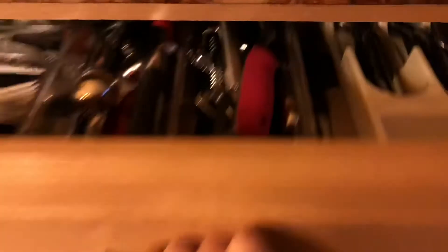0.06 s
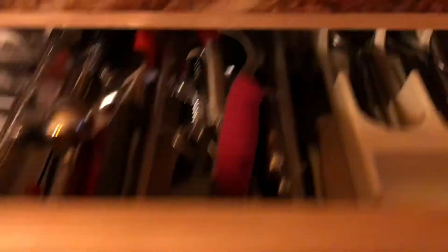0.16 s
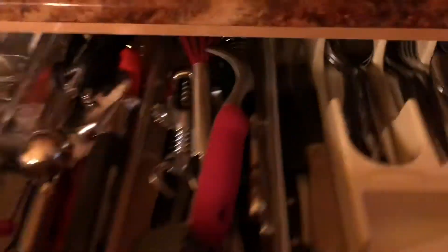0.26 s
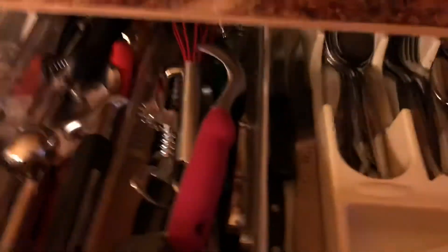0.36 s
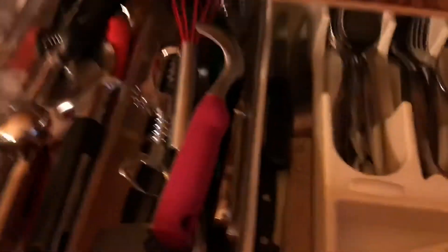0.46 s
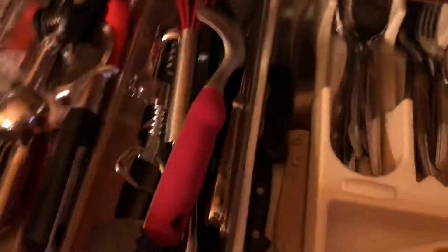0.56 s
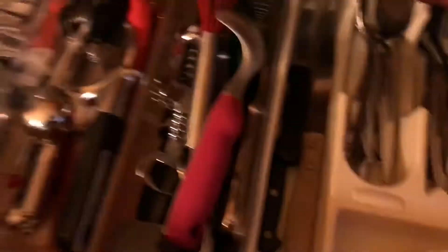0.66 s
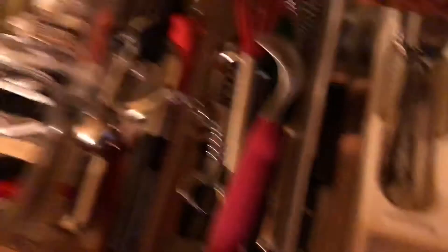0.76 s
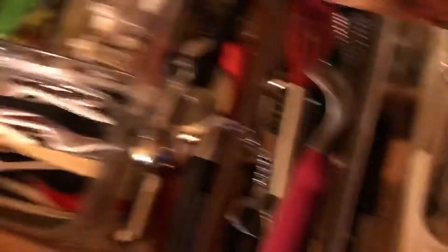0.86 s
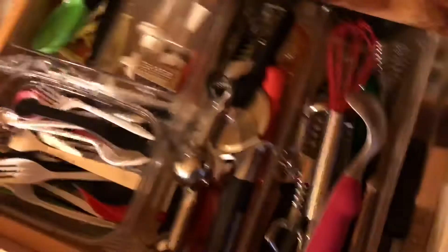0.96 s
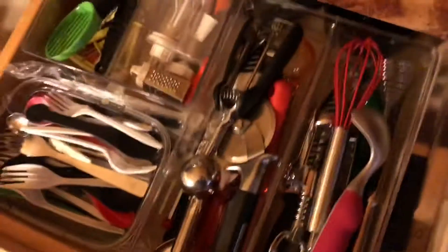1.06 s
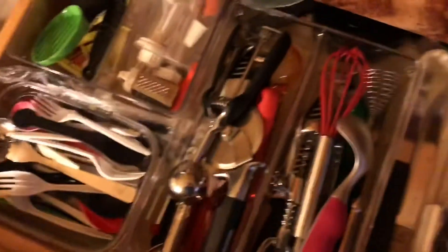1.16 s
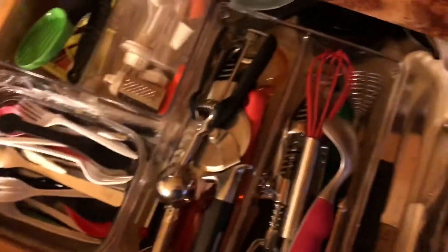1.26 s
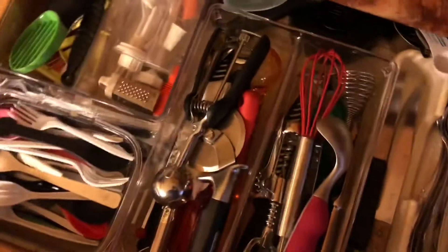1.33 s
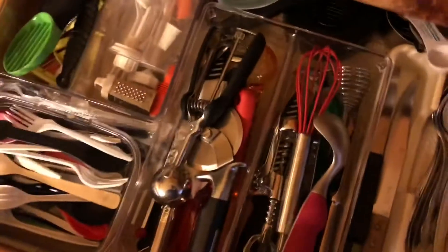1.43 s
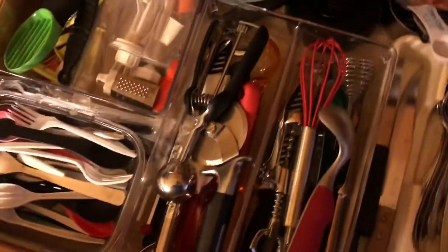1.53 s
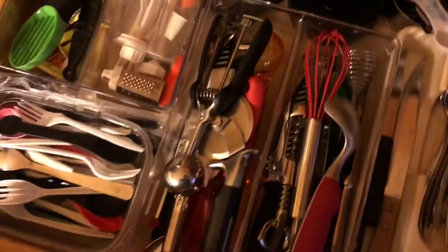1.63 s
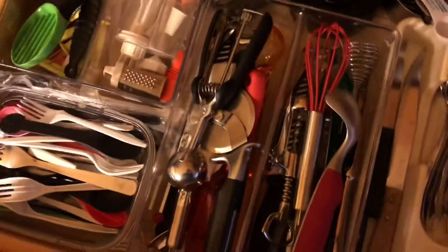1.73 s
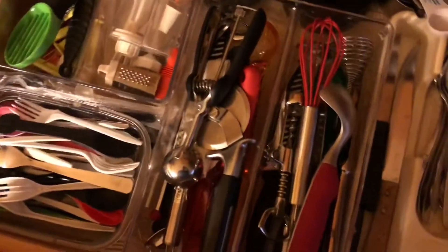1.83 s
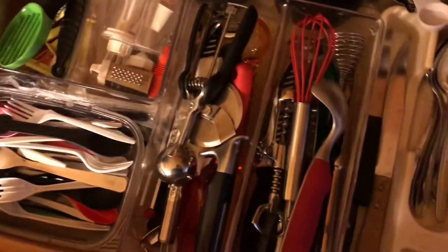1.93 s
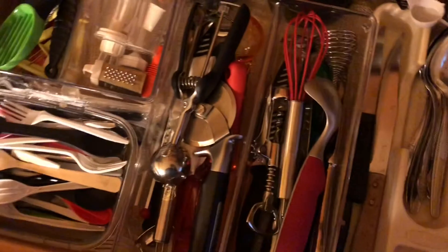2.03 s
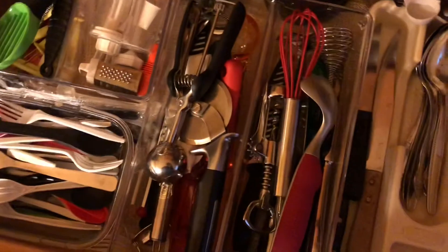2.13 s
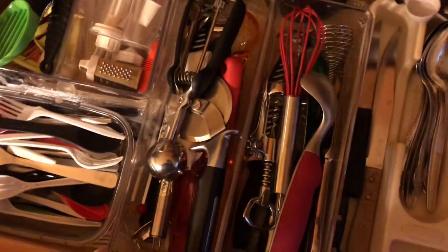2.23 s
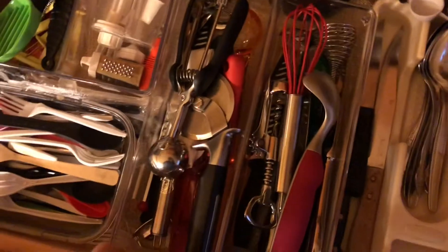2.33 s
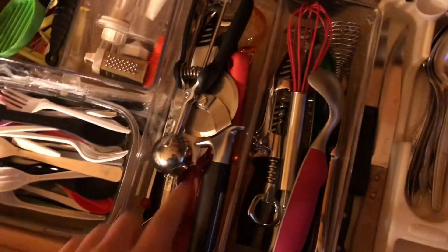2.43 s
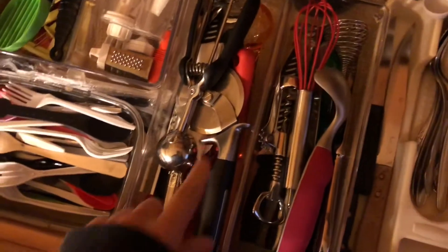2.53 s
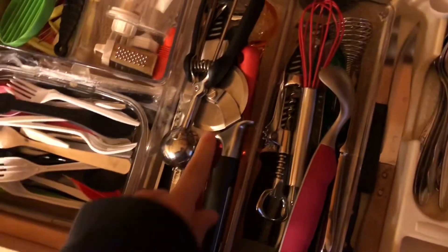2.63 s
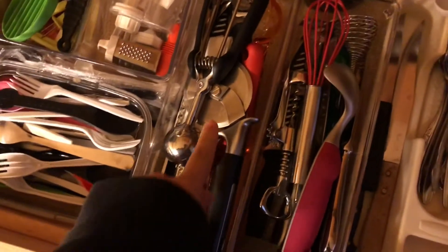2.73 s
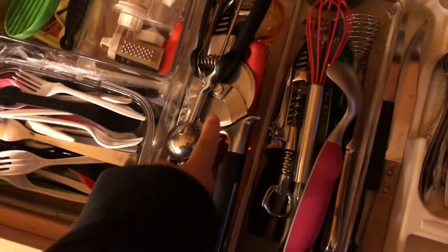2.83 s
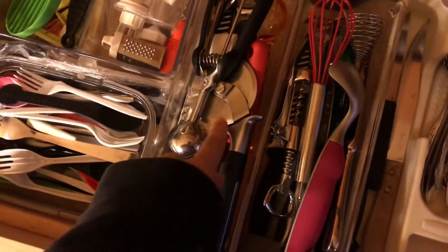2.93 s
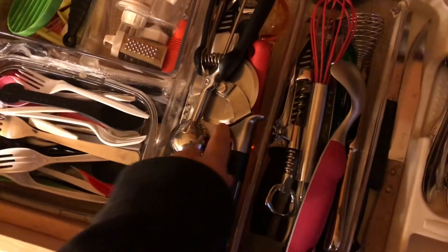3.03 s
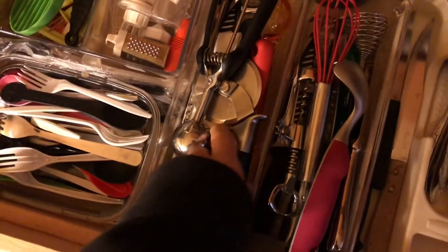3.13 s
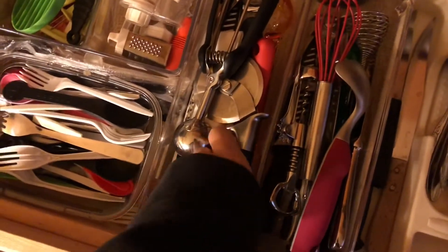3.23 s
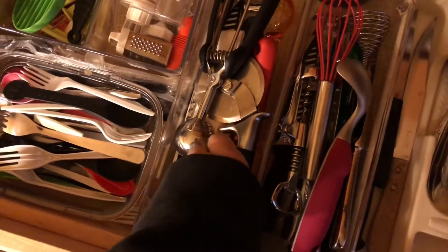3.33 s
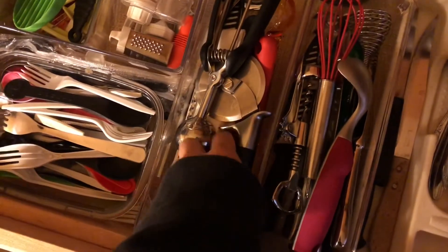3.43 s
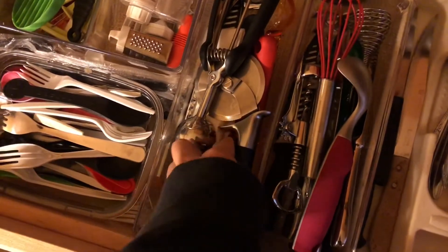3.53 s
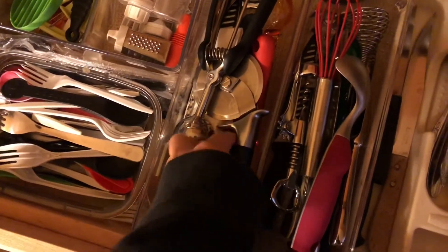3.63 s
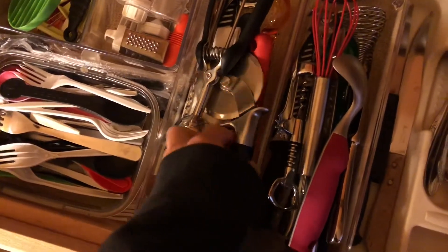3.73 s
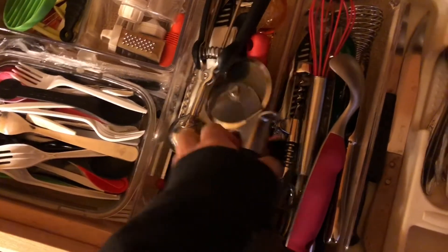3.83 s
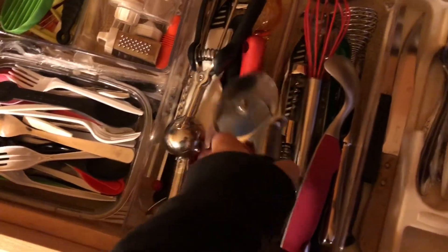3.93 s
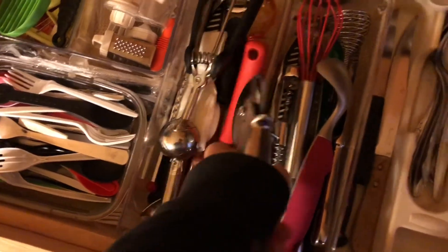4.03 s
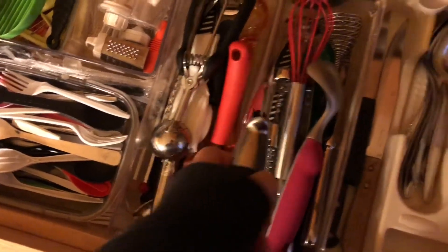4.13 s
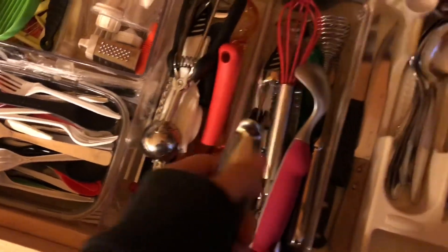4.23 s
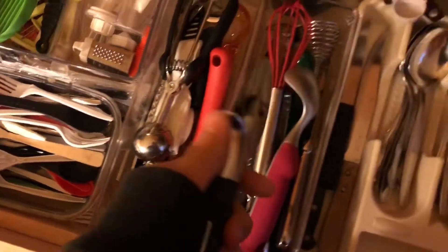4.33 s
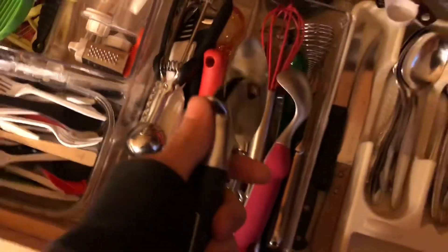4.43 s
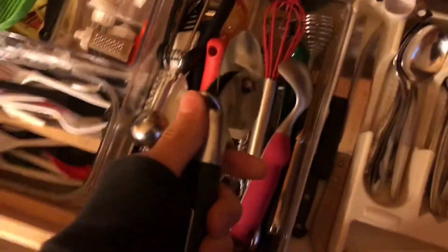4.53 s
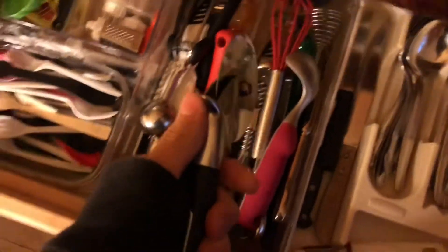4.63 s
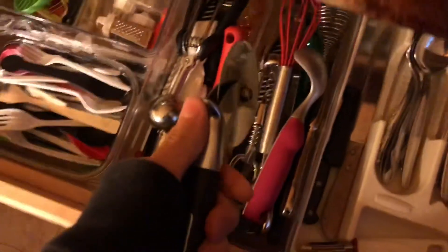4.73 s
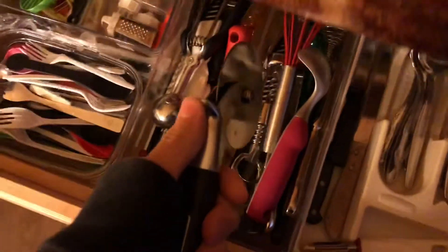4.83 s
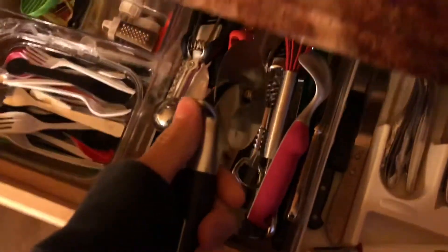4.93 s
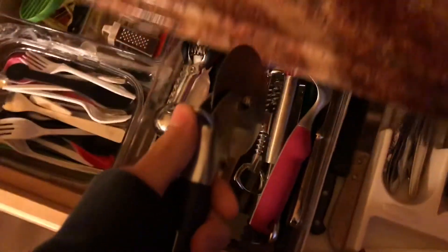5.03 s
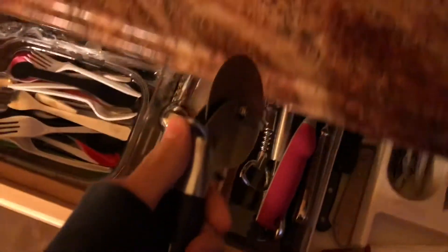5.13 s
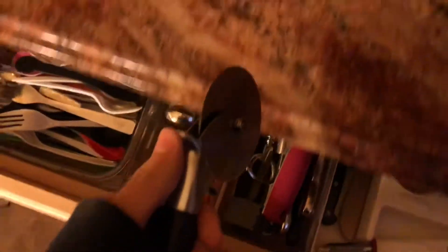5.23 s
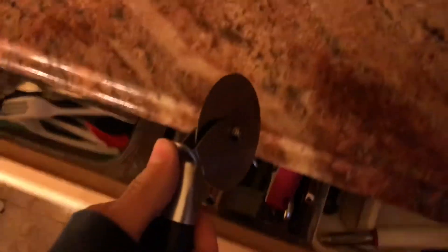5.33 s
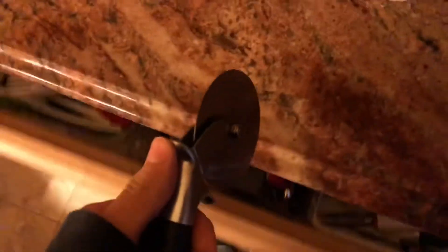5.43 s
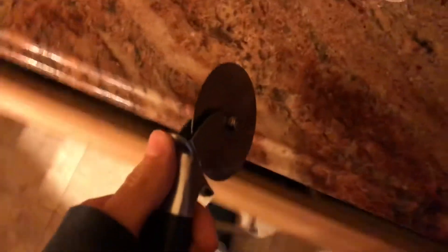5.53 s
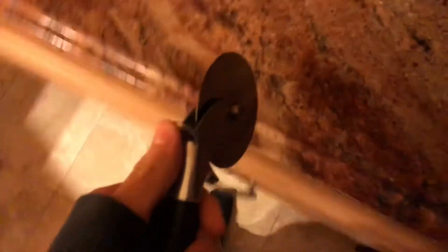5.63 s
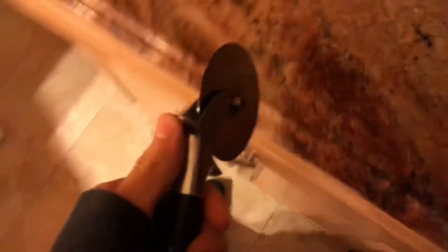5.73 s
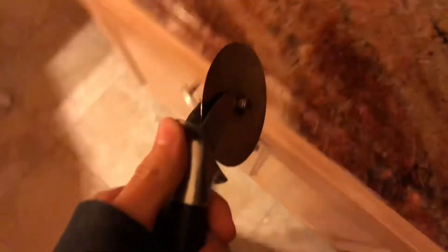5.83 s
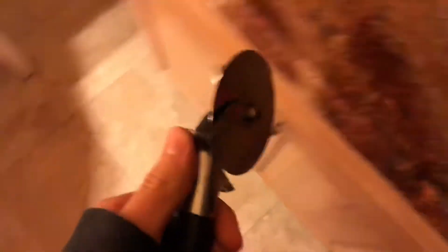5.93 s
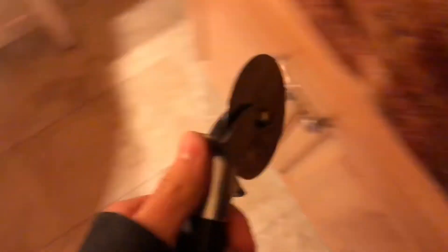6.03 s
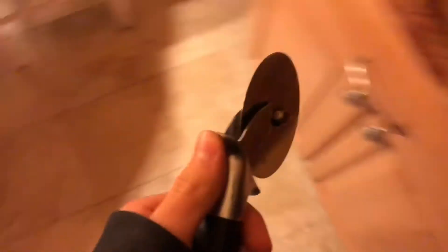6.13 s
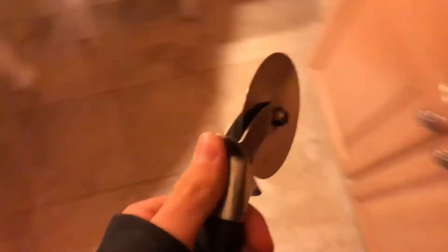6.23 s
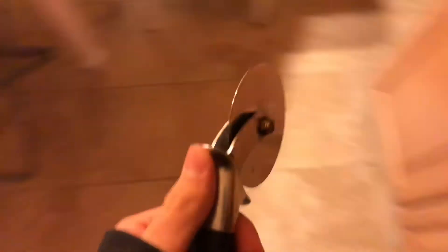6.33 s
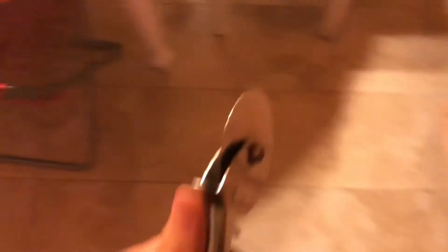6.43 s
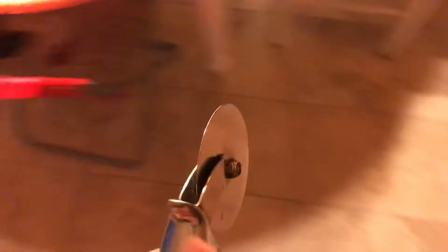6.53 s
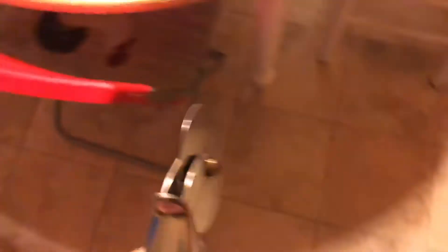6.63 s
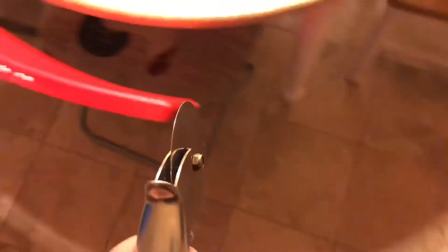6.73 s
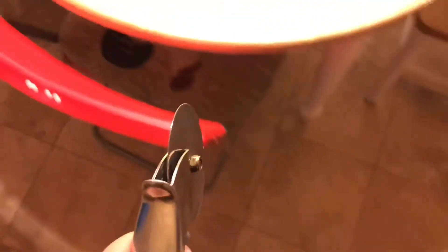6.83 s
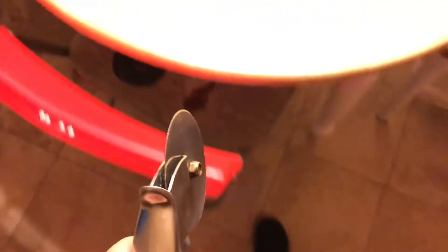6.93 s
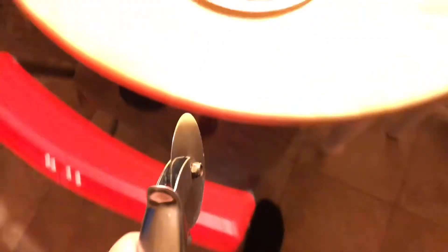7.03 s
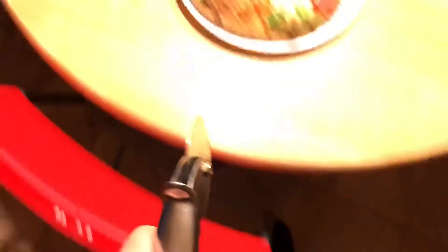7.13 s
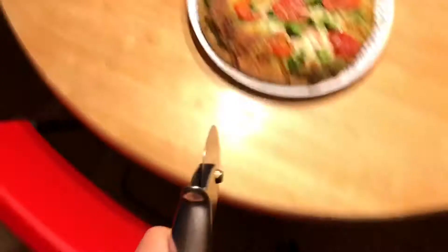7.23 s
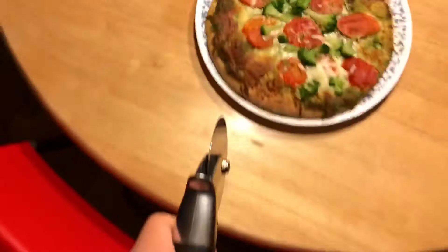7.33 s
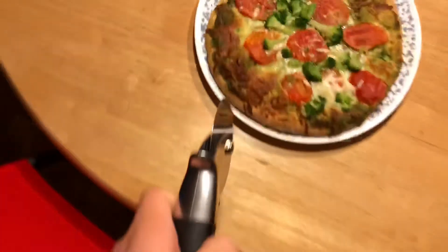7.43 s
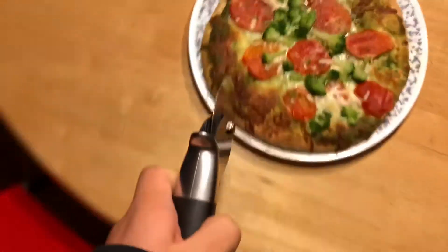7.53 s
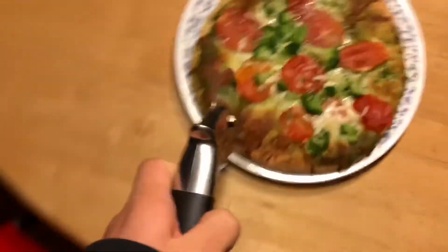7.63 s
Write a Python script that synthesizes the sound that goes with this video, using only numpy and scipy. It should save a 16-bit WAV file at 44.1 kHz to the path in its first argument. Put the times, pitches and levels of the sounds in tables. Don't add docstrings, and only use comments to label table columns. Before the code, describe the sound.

Heard close through a phone in a small, hard kitchen. From 0 s a wooden drawer is already rolling out: rough low drumming from the rollers, scraping slides and loose tools chattering, with knocks and clinks near 0.5-0.65 s and more rattles around 1.1 and 1.5 s. It settles by 1.8 s, leaving quiet room tone, handling rumble and faint sleeve rustle. At 3.2 and 3.5 s fingers nudge utensils with light clinks and dull taps. From 3.8 s digging turns hard, peaking at 4.0-4.25 s in a loud, dense metal clatter with woody knocks as the pizza cutter comes free. Its disc rings high and thin, beating and slowly fading to the end. The drawer rumbles shut from 4.5 s, quickens around 5.2 s and thuds at 5.75 s. Shoes scuff at 6.4-6.5 s and a heel lands at 7.5 s, over a faint low fridge drone.

```python
import sys
import numpy as np
from scipy import signal
from scipy.fft import rfft, irfft
from scipy.io import wavfile
from scipy.ndimage import uniform_filter1d

SR = 44100
rng = np.random.default_rng(int(sys.argv[2]) if len(sys.argv) > 2 else 0)


def unload_audio(sound):
    columns = np.transpose(np.atleast_2d(sound))
    steps = np.round(np.clip(columns, -1, 1) * 32767)
    wavfile.write(sys.argv[1], SR, steps.astype(np.int16))


def gain_from_decibels(decibels):
    exponent = np.asarray(decibels, float) / 20
    return 10 ** exponent


N = 337806

# t/s, load level/dB, speed level/dB
OPENING = [
    (0, -48, -2),
    (.34, -51, -7.5),
    (.46, -53, -12.5),
    (.61, -58, -13),
    (.84, -54.5, -9.5),
    (1.02, -50.5, -14),
    (1.14, -52, -14.5),
    (1.41, -63.5, -15),
    (1.77, -83, -13.5),
]
# t/s, load level/dB, speed level/dB
CLOSING = [
    (4.4, -85, -14),
    (4.55, -43.5, -9.5),
    (4.69, -51, -8.5),
    (5, -50.5, -10),
    (5.22, -51, 2),
    (5.5, -52.5, -8),
    (5.71, -53.5, -10),
    (5.78, -36.5, -9),
    (6, -70, -23),
]


def level(x, db):
    return x * gain_from_decibels(db) / np.sqrt(np.mean(x ** 2))


def band(x, hz, width_hz):
    return signal.lfilter(*signal.iirpeak(hz, hz / width_hz, SR), x)


def body(x, modes):
    total = 0
    for k, (hz, width_hz, db) in enumerate(modes):
        resonance = band(band(x, hz, width_hz), hz, 3 * width_hz)
        total = total + (-1) ** k * gain_from_decibels(db) * resonance
    return level(total, 0)


def walk(rate):
    hold = int(SR / rate)
    steps = np.repeat(rng.standard_normal(N // hold + 1), hold)
    return 1.72 * uniform_filter1d(uniform_filter1d(steps, hold), hold)[:N]


def fade(t, t60):
    return np.exp(-np.log(1000) * t / np.maximum(t60, 0.004))


def add(out, s, sound):
    i = int(s * SR)
    out[i:i + len(sound)] += sound[:N - i]


def cluster(t, lo_hz, hi_hz, t60, chance, push_s):
    place, size, life, late = chance[:, :, None]
    since = np.maximum(t - push_s * late, 0)
    hz = lo_hz * (hi_hz / lo_hz) ** place
    rings = np.sin(2 * np.pi * hz * since) * fade(since, t60 * (0.21 + life))
    sound = np.sum(size * rings, axis=0)
    return sound / np.abs(sound).max()


def burst(t, lo_hz, hi_hz, t60):
    sos = signal.butter(2, [lo_hz, hi_hz], "bandpass", fs=SR, output="sos")
    noise = level(signal.sosfilt(sos, rng.standard_normal(len(t))), 0)
    return noise * fade(t, t60) * np.minimum(t / 0.001, 1)


def grit(scatter_db, flicker_db, rate):
    slip_db = scatter_db * np.minimum(rng.exponential(size=N), 4.5)
    return rng.standard_normal(N) * gain_from_decibels(slip_db + flicker_db * walk(rate))


def air():
    # f/Hz, level/dB per Hz
    room_tone = [(59, -32.5), (100, -8), (244, -3.5), (328, -15.5), (373, -8), (492, -13.5), (2080, -23.5),
                 (16000, -32)]
    hz, db = np.transpose(room_tone)
    f = np.fft.rfftfreq(N, 1 / SR) + 1
    colour = gain_from_decibels(np.interp(np.log(f), np.log(hz), db))
    return level(irfft(colour * rfft(rng.standard_normal(N)), N), -71)


def rumble():
    # t/s, peak level/dB
    thump_hits = [(.08, -77), (.3, -57), (.58, -53.5), (1.05, -64), (1.3, -59), (1.54, -62), (4.12, -65),
                  (5.05, -67.5), (5.37, -65), (5.78, -60), (6.05, -64), (6.5, -58), (7.6, -57)]
    rest_db, rise_s, t60_s = -70.5, 0.046, 0.51
    t = np.arange(N) / SR
    shake = level(band(band(rng.standard_normal(N), 71, 60), 55, 47), 0)
    strength = gain_from_decibels(rest_db)
    for s, db in thump_hits:
        swell = np.exp(np.minimum(t - s, 0) / rise_s)
        strength = strength + gain_from_decibels(db) * swell * fade(np.maximum(t - s, 0), t60_s)
    return shake * strength


def motion():
    # t/s, load level/dB, speed level/dB
    digging = [
        (3.05, -83, -4),
        (3.23, -59, -25),
        (3.57, -98, 5),
        (3.69, -69.5, -5),
        (3.86, -48.5, -1),
        (3.98, -60.5, -6.5),
        (4.16, -40.5, -2.5),
        (4.28, -57.5, -23),
        (4.36, -65, -20),
    ]
    # t/s, load level/dB, speed level/dB
    walking = [
        (6.019, -66, -24),
        (6.41, -77.5, 0.5),
        (6.43, -66.5, 3),
        (6.6, -62, -12.5),
        (6.83, -68.5, -12.5),
        (7.37, -77.5, -8.5),
        (7.5, -77, -1),
        (7.547, -46.5, -5),
        (7.66, -51.5, -11),
    ]
    # scrape level/dB and hiss level/dB below its load, share of speed/1
    rubbing = [
        (-13.5, -16, 0.43),
        (-13, -13, 1),
        (-18, -30.5, 0.51),
        (0, -16, 0.93),
    ]
    # level/dB of box, panel, scrape, hiss, runners
    rest_db = (-73.5, -84, -98.5, -82.5, -89)
    # middle t/s, length/s, level/dB
    brushes = [
        (0.288, 0.42, -70.5),
        (1.306, 0.3, -72),
        (2.795, 1, -86),
        (3.831, 0.11, -59),
        (3.943, .07, -54),
        (5.67, 0.4, -74.5),
        (7.119, 1, -75.5),
    ]
    # f/Hz, width/Hz, level/dB
    box_modes = [(146, 38, -2), (210.4, 36.6, -1), (294, 83, -2.5), (380, 78, -6)]
    # f/Hz, width/Hz, level/dB
    panel_modes = [(526, 112, 6.3), (700, 45, 3.6), (878, 181, 2)]
    # f/Hz, width/Hz, level/dB
    runner_modes = [(1072, 330, 3.5), (1300, 300, 0), (1620, 350, -9.5)]
    # f/Hz, width/Hz, level/dB
    scrape_modes = [(1950, 3300, -5.5), (3300, 2800, 0), (4360, 3100, -7)]
    # f/Hz, width/Hz, level/dB
    hiss_modes = [(7100, 4500, 0.92), (11400, 1800, 0.5), (14160, 3600, 1.5)]
    # f/Hz, width/Hz, level/dB
    slide_modes = [(1650, 690, 1.5), (3200, 1200, -4.5), (4200, 1050, -2), (5600, 1200, -2.5)]
    slide_until_s, brush_scrape_db = 2.8, -7
    t, gains = np.arange(N) / SR, gain_from_decibels(np.array(rest_db))[:, None]
    for move, (scrape_db, hiss_db, share) in zip((OPENING, digging, CLOSING, walking), rubbing):
        s, load_db, speed_db = np.transpose(move)
        load = np.interp(t, s, load_db, left=-120, right=-120)
        speed = np.interp(t, s, speed_db)
        scrape_part = scrape_db + share * speed
        hiss_part = hiss_db + share * speed
        runner_part = -5 + 1.46 * speed
        gains = gains + gain_from_decibels(load + np.array([0 * t, speed, scrape_part, hiss_part, runner_part]))
    brush = 0
    for s, length, db in brushes:
        brush = brush + gain_from_decibels(db) * np.cos(np.pi * np.clip((t - s) / length, -0.5, 0.5)) ** 2
    roll = grit(0.94, 0.65, rate=80)
    rub = grit(2.3, 0.82, rate=53)
    low = gain_from_decibels(-1.7) * gains[0] * body(roll, box_modes)
    low = low + gain_from_decibels(1.5) * gains[1] * body(roll, panel_modes)
    low = low + gains[4] * body(grit(2.3, 1.2, rate=83), runner_modes)
    colour = np.where(t < slide_until_s, gain_from_decibels(1.0) * body(rub, slide_modes), body(rub, scrape_modes))
    scrape = (gains[2] + gain_from_decibels(brush_scrape_db) * brush) * colour
    hiss = (gains[3] + brush) * body(rub, hiss_modes)
    return low + gain_from_decibels(1.5) * scrape + gain_from_decibels(-0.5) * hiss


def rollers():
    pitch_hz, wander = 296, 0.11
    t, load = np.arange(N) / SR, 0
    for move, db in zip((OPENING, CLOSING), (1.5, -0.5)):
        s, load_db, speed_db = np.transpose(move)
        load = load + gain_from_decibels(np.interp(t, s, load_db + db + 0.45 * speed_db, left=-120, right=-120))
    hz = pitch_hz * (1 + wander * walk(90))
    note = np.sin(2 * np.pi * np.cumsum(hz) / SR)
    return load * note * gain_from_decibels(2.0 * walk(70))


def knocks():
    # t/s, peak level/dB, f/Hz
    chatter = [(0.038, -42, 1210), (0.114, -50, 918), (0.137, -52, 947), (0.177, -56, 1150),
               (0.208, -53, 930), (0.478, -50, 907), (1.017, -57, 991), (1.038, -51, 880),
               (1.081, -45, 920), (1.099, -41, 830), (1.201, -52, 864), (1.226, -48, 896),
               (1.277, -51, 870)]
    # t/s, peak level/dB, f/Hz, t60/s
    bumps = [(0.501, -42.5, 790, 0.063), (0.518, -31, 292, 0.082), (0.547, -27, 700, 0.019),
             (0.56, -39, 483, 0.078), (0.985, -40, 395, 0.052), (1.147, -47, 380, 0.04),
             (1.478, -47.5, 175, 0.38), (1.494, -47, 890, 0.037), (3.048, -55, 840, 0.041),
             (3.183, -41, 927, 0.07), (3.197, -29, 395, 0.02), (3.196, -33, 1070, 0.027),
             (3.511, -41, 350, 0.043), (3.766, -44, 376, 0.38), (3.801, -35.5, 740, 0.045),
             (3.83, -31.5, 776, 0.094), (3.855, -27, 805, 0.035), (3.979, -32, 920, 0.036),
             (4.038, -23.5, 348, 0.19), (4.064, -25.5, 944, 0.031), (4.1055, -12, 824, 0.048),
             (4.117, -23, 944, 0.067), (4.173, -24, 605, 0.046), (4.202, -14.5, 1085, 0.045),
             (4.228, -33, 963, 0.086)]
    # t/s, peak level/dB, f/Hz, t60/s
    landings = [(4.525, -29.5, 345, 0.034), (4.558, -40, 322, 0.32), (5.365, -44, 524, 0.28),
                (5.728, -39, 700, 0.066), (5.748, -32.5, 212, 0.1), (5.765, -31, 266, 0.029),
                (5.79, -29.5, 140.3, 0.24), (5.823, -49, 133, 0.2), (5.823, -37.5, 4120, 0.053),
                (5.862, -41.5, 3900, 0.053), (6.532, -40.5, 466, 0.039), (6.54, -50, 90.5, 0.16),
                (7.505, -37.5, 145, 0.15), (7.545, -37, 143, 0.34), (7.579, -34, 125, 0.058)]
    # t/s, peak level/dB, f/Hz, t60/s
    tray = [(3.177, -42.5, 642, 0.051), (3.319, -48, 730, 0.044), (3.712, -52, 700, 0.04),
            (3.732, -54, 1020, 0.061), (3.785, -47, 1100, 0.052), (3.812, -34, 916, 0.05),
            (3.842, -40, 990, 0.042), (3.864, -26.5, 885, 0.022), (4.0075, -28, 1364, 0.019),
            (4.107, -28, 144, 0.18), (4.108, -37, 1210, 0.089), (4.112, -24.5, 399, 0.081),
            (4.205, -31, 377.3, 0.2), (4.206, -17.5, 836, 0.055), (6.424, -49, 1207, 0.11),
            (6.436, -47.5, 1300, 0.15), (6.468, -48, 1160, 0.092), (7.52, -39.5, 210, 0.04)]
    chatter_db, chatter_t60_s = -4.5, 0.049
    rattle_t60_s = 0.083
    chattering = [(s, db + chatter_db, hz, chatter_t60_s) for s, db, hz in chatter]
    blows = bumps + landings + chattering + tray
    out, t = np.zeros(N), np.arange(7000) / SR
    chance = rng.random((len(blows), 4, 8))
    for (s, db, hz, t60), luck in zip(blows, chance):
        board = np.sin(2 * np.pi * hz * t) * fade(t, t60) * np.minimum(t / 0.0029, 1)
        brief = min(t60, rattle_t60_s)
        others = cluster(t, 0.55 * hz, 2.0 * hz, 0.807 * brief, luck, push_s=0.00632)
        rattle = burst(t, 0.45 * hz, 2.1 * hz, 1.1 * brief)
        add(out, s, gain_from_decibels(db) * (0.78 * board + 0.33 * others + 0.38 * rattle))
    return out


def clinks():
    # t/s, body peak level/dB, bright peak level/dB, body f/Hz, bright f/Hz
    jolts = [(0.1746, -66, -49, 1130, 4700), (0.3527, -37.5, -48, 1190, 4800),
             (0.502, -48, -53, 1320, 8230), (0.517, -39, -66, 1170, 6510), (0.544, -39, -53, 1240, 5750),
             (0.64, -31, -42, 1300, 5160), (0.6488, -27, -36.5, 1507, 7600),
             (0.7675, -38.5, -50, 1550, 5530), (1.08, -47, -57, 1620, 15360), (1.101, -45, -57, 1690, 4650),
             (1.144, -49, -52, 1500, 7900), (1.228, -59, -55, 1300, 4600), (1.455, -53, -70, 1490, 5400),
             (1.477, -46.5, -70, 1570, 5420), (1.4955, -43.5, -57, 2100, 4820),
             (1.5202, -43, -56, 1410, 6080), (1.5466, -44, -55, 1500, 4720),
             (1.5658, -45.5, -60, 1570, 4750), (1.588, -53, -68, 1500, 5400),
             (1.7487, -53.5, -66, 2200, 5940)]
    probes = [(3.1743, -52, -47, 1340, 12380), (3.181, -54, -47, 1390, 4860),
              (3.1961, -32.5, -41, 1180, 12360), (3.2467, -33.5, -44.5, 1446, 6140),
              (3.4882, -38, -42, 1740, 6100), (3.501, -45.5, -43, 3520, 6210),
              (3.512, -39.5, -58.5, 1100, 10260), (3.552, -50, -42.5, 2500, 7000),
              (3.5574, -35, -36.5, 1510, 8130), (3.625, -49, -50, 3170, 4920),
              (3.664, -44, -54, 1080, 7410), (3.8004, -58, -46.5, 1160, 6560),
              (3.821, -31.5, -49, 4270, 5640), (3.854, -18, -36, 1110, 5230), (3.861, -34, -41, 3200, 6420),
              (3.868, -22, -21.5, 1170, 11670), (3.928, -43.5, -36, 3600, 9800),
              (3.935, -42.5, -32, 2020, 5720)]
    tugs = [(3.9794, -38, -30.5, 1470, 6280), (3.99, -27, -31.5, 4280, 11700),
            (4.0071, -27, -27, 1420, 7300), (4.0135, -36, -36, 2430, 5030),
            (4.0175, -27, -28.5, 1750, 11400), (4.0252, -23, -24.5, 1710, 11400),
            (4.0587, -31.5, -27, 2604, 6200), (4.099, -36, -27, 1350, 10900),
            (4.1028, -34, -40, 3000, 6000), (4.1074, -23.5, -29, 3020, 5870), (4.115, -27, -25, 1400, 5900),
            (4.123, -28, -28.5, 2530, 13000), (4.138, -21, -42.5, 1120, 7950),
            (4.1532, -21, -30, 1834, 5460), (4.1727, -28, -32, 1343, 5400), (4.177, -21, -41, 2355, 6370),
            (4.182, -18, -49, 1183, 5400), (4.2028, -11, -14.5, 2400, 7120),
            (4.208, -18.5, -16.5, 1040, 13300), (4.2161, -22, -34, 2800, 5450)]
    shifts = [(4.513, -33, -38, 1280, 11600), (4.522, -45, -40, 3300, 9540), (4.538, -29, -40, 3780, 5500),
              (4.543, -36, -28.5, 1100, 5600), (4.5596, -28, -26.5, 1295, 9200),
              (4.571, -31, -29, 1100, 9070), (4.604, -47, -32, 3250, 8550), (4.608, -40, -27.5, 1100, 5031),
              (4.633, -48, -36.5, 1140, 4980), (4.6776, -38, -41.5, 1120, 13500),
              (4.721, -42.5, -52, 3590, 7280), (4.918, -45.5, -60, 1790, 4830),
              (5.088, -60, -55.5, 1110, 9500), (5.142, -62, -59, 1500, 9500), (5.729, -41, -46, 2000, 8050),
              (5.749, -29, -36, 1140, 5040), (5.756, -30, -54, 4000, 7300), (5.766, -26, -53, 3200, 6710),
              (6.5289, -39, -66, 1515, 5420), (7.506, -43.5, -58, 1510, 10300),
              (7.536, -26, -57, 2880, 6150)]
    contacts = jolts + probes + tugs + shifts
    out, t, t60 = np.zeros(N), np.arange(2600) / SR, 0.13
    chance = rng.random((len(contacts), 4, 36))
    for (s, body_db, bright_db, body_hz, bright_hz), luck in zip(contacts, chance):
        top_hz = min(2.62 * body_hz, 5000)
        handle = 0.29 * cluster(t, 0.7 * body_hz, top_hz, 0.19 * t60, luck[:, :14], push_s=0.004)
        handle = handle + 0.22 * burst(t, 0.25 * body_hz, 2.0 * body_hz, 0.32 * t60)
        handle = handle + 0.22 * np.sin(2 * np.pi * body_hz * t) * fade(t, 0.28 * t60)
        edge = 0.35 * cluster(t, 4550, 15800, 0.2 * t60, luck[:, 14:], push_s=0.0026)
        crack = burst(t, 0.41 * bright_hz, min(1.94 * bright_hz, 17000), 0.62 * t60)
        edge = edge + 0.37 * crack * (0.27 + 1.18 * fade(t, 0.013))
        edge = edge + 0.27 * np.sin(2 * np.pi * bright_hz * t) * fade(t, 0.27 * t60)
        add(out, s, gain_from_decibels(body_db) * handle + gain_from_decibels(bright_db) * edge)
    return out


def pops():
    # t/s, peak level/dB, f/Hz
    snaps = [(0.177, -57, 3600), (0.354, -37.5, 1200), (0.3548, -52, 3500), (0.5066, -48, 1500),
             (0.5551, -45, 730), (0.558, -47, 1800), (0.566, -41, 1300), (0.59, -47, 1570),
             (0.65, -34.5, 5470), (0.651, -40, 1300), (0.672, -50, 2300), (0.7688, -43.5, 3500),
             (1.101, -48, 4200), (1.4924, -50, 600), (3.1945, -55, 2500), (3.199, -40, 700),
             (3.495, -43, 8700), (3.4967, -42, 1690), (3.7688, -44.5, 653), (3.8039, -36, 670),
             (3.83, -44, 2070), (3.833, -33, 900), (3.857, -25, 850), (3.8642, -40.5, 1510),
             (3.875, -37, 1300), (3.887, -43, 4000), (3.903, -43, 1080), (3.943, -40, 4460),
             (3.98, -38, 1510), (4.0098, -27, 1245), (4.02, -31, 1570), (4.0404, -25.5, 914),
             (4.0442, -33, 9950), (4.1113, -29, 1770), (4.117, -26.5, 497), (4.1265, -30, 2480),
             (4.1399, -33, 8100), (4.1473, -26, 800), (4.1785, -37, 5470), (4.192, -24, 900),
             (4.208, -13.5, 1200), (4.222, -22, 700), (4.3133, -42, 775), (4.5185, -40, 775),
             (4.5228, -36, 9560), (4.5266, -46, 7670), (4.5625, -35, 930), (4.5683, -30, 7800),
             (4.609, -40, 590), (4.7225, -37, 3480), (5.1467, -39, 754), (5.1871, -41, 806),
             (5.247, -43, 690), (5.3142, -39.5, 580), (5.73, -49, 1000), (5.7612, -44, 8700),
             (5.8279, -43, 7470), (6.5311, -48, 1980), (6.5315, -54, 814), (7.5385, -42, 6070)]
    # t/s, peak level/dB, f/Hz
    tinks = [(0.55, -46, 2300), (0.6425, -48, 5030), (0.651, -40.5, 3350), (0.651, -46, 4370),
             (4.026, -35, 3300), (4.026, -38, 5860), (4.0605, -38, 4100), (4.108, -29, 3300),
             (4.1545, -35.5, 5460), (4.1815, -31, 2235), (4.2045, -21, 3010), (4.2175, -32, 5540),
             (4.195, -30, 880), (4.232, -29, 850), (6.436, -44, 1260)]
    swings, pop_least_s, tink_s = 1.07, 0.00026, 0.0012
    out, t = np.zeros(N), np.arange(-300, 300) / SR
    for hits, least_s in ((snaps, pop_least_s), (tinks, tink_s)):
        for s, db, hz in hits:
            bell = np.exp(-(t / (least_s + swings / hz)) ** 2)
            add(out, s + t[0], gain_from_decibels(db) * np.sin(2 * np.pi * hz * t) * bell)
    return out


def scuffs():
    starts = (.54, 3.489, 3.855, 4.203, 4.512, 5.752, 5.826, 6.417, 7.49, 7.535)
    # body level/dB, mid level/dB, bright level/dB, t60/s
    skids = [
        (-44, -66, -68, 0.25),
        (-45, -51.5, -52.5, 0.22),
        (-42.5, -45.5, -53.5, 0.96),
        (-39.5, -47, -55, 0.45),
        (-40, -44.5, -52, 0.45),
        (-37, -46.5, -57.5, 0.5),
        (-41.5, -53, -59, 0.34),
        (-45, -49, -58.5, 0.7),
        (-54.5, -69, -75, 0.54),
        (-64.5, -43, -83, 0.29),
    ]
    # f/Hz, width/Hz
    skid_bands = [(1200, 1980), (3300, 4170), (6500, 8200)]
    out, t = np.zeros(N), np.arange(20000) / SR
    for s, (*dbs, t60) in zip(starts, skids):
        skid = rng.standard_normal(len(t)) * gain_from_decibels(1.8 * rng.exponential(size=len(t)) - 1.5)
        skid = skid * fade(t, t60) * np.minimum(t / 0.013, 1)
        for db, (hz, width_hz) in zip(dbs, skid_bands):
            add(out, s, gain_from_decibels(db + 6) * band(band(skid, hz, width_hz), hz, width_hz))
    return out


def wheel():
    # f/Hz, level/dB, t60/s
    wheel_modes = [(4390, -49, 0.24), (7360, -45, 0.18), (11400, -24, 0.019), (11430, -48, 0.2),
                   (12250, -32.5, 0.061), (12430, -30.5, 0.089), (14200, -37, .04), (15710, -38, .2),
                   (2000, -53.5, 0.5)]
    # t/s, level/dB, extra level/dB of the fork mode
    wheel_hits = [
        (3.8691, 1, 4),
        (3.936, -20, -4.5),
        (4.025, -18.5, 15),
        (4.203, -26, 12),
    ]
    out, t = np.zeros(N), np.arange(20000) / SR
    hz, db, t60 = np.transpose(wheel_modes)[:, :, None]
    rings = gain_from_decibels(db) * np.sin(2 * np.pi * hz * t) * fade(t, t60)
    fork = rings[3]
    for s, blow_db, fork_db in wheel_hits:
        add(out, s, gain_from_decibels(blow_db) * (rings.sum(axis=0) + (gain_from_decibels(fork_db) - 1) * fork))
    return out


def disc():
    # level/dB when lifted, t60/s
    low_modes = [(-51.5, 6.2), (-42, 4.86), (-56.5, 7.4)]
    low_hz = (2023.3, 4493.3, 4476.55)
    # t/s, first pattern level/dB, second level/dB, its twin level/dB, further away/mm
    facing = [(4.25, -11, -19, -8, 30), (4.34, -9, -5.5, 0, 15), (4.4, -5.5, -9.5, -6, 2),
              (4.46, -1, 0, -7, -3), (4.58, 0, -0.5, 5, -2), (4.75, 0.5, -3.5, -5, 0),
              (4.9, 0, -4, -2.5, 3), (5.15, 0, 1.5, -8, 2), (5.35, -3.5, -3.5, -0.5, -1),
              (5.5, -3, -4, -5, -4), (5.75, 0, -2, -5, 10), (6, 5, 1, -2, -4), (6.25, 5.5, -2, -1.5, 13),
              (6.55, 3.5, -2.5, -3, 14), (6.85, 4, -1, -5.5, 38.5), (7.15, 3.5, 2, -7, 69),
              (7.3, -8, -6.5, -12, 92), (7.45, 1, -4, -8, 112.5)]
    # level/dB, t60/s
    top_modes = [(-39, 0.98), (-51, 1), (-40, 0.48)]
    top_hz = (7670.5, 7661, 7651)
    free_s, touch_s, lift_s = 4.222, 4.52, 4.345
    low_beat_s, top_beat_s = 4.23, 4.298
    tremor_mm, tremor_db = 2.5, 0.35
    t = np.arange(N) / SR
    s, *facings, away_mm = np.transpose(facing)
    free = np.clip((t - free_s) / 0.0075, 0, 1)
    sent = t - (np.interp(t, s, away_mm) + tremor_mm * walk(14)) / 343000
    low = 0
    for hz, (db, t60), facing_db in zip(low_hz, low_modes, facings):
        strength = gain_from_decibels(np.interp(t, s, facing_db) + db + 3.5 + tremor_db * walk(18))
        low = low + strength * fade(t - lift_s, t60) * np.cos(2 * np.pi * hz * (sent - low_beat_s))
    since = np.maximum(t - free_s, 0)
    top = 0
    for hz, (db, t60) in zip(top_hz, top_modes):
        top = top + gain_from_decibels(db) * fade(since, t60) * np.cos(2 * np.pi * hz * (t - top_beat_s))
    finger = fade(np.maximum(t - touch_s, 0), 0.56)
    return free * (low + top * finger)


def fridge():
    # t/s, level/dB
    drone_levels = [
        (5.6, -69),
        (6.05, -64.5),
        (6.5, -69),
        (7.3, -62),
    ]
    hz = 144
    drone = level(band(band(rng.standard_normal(N), hz, 30), hz, 40), 0)
    return drone * gain_from_decibels(np.interp(np.arange(N) / SR, *np.transpose(drone_levels)))


def room(x):
    t60_s, treble_t60_s, tail_db = 0.38, 0.22, -13
    t = np.arange(SR // 2) / SR
    hiss = rng.standard_normal(len(t))
    dull = signal.lfilter([0.2], [1, -0.8], hiss)
    tail = dull * fade(t, t60_s) * 3.0 + (hiss - dull) * fade(t, treble_t60_s)
    tail = tail * np.minimum(t / 0.0056, 1)
    return signal.fftconvolve(x, tail * gain_from_decibels(tail_db) / np.sqrt(np.sum(tail ** 2)))[:N]


def scene():
    blows = clinks() + knocks() + wheel() + pops()
    steady = air() + rumble() + motion() + rollers() + fridge()
    return (blows + room(blows) + scuffs() + disc() + steady)[None]


def masked(x):
    mask_db, db_per_octave, from_hz = -36, 18, 4600
    f, _, z = signal.stft(x, SR, nperseg=2048)
    f = f[:, None]
    power = np.abs(z) ** 2 + 1e-20
    slope = db_per_octave * np.log2(f + 1)
    masker = np.where(f > 4000, 10 * np.log10(power), -200)
    shadow = np.maximum.accumulate(masker + slope, axis=1) - slope
    near = uniform_filter1d(uniform_filter1d(power, size=20, axis=1), size=3, axis=2)
    keep = (10 * np.log10(near) > shadow + mask_db) | (f < from_hz)
    return signal.istft(z * keep, SR, nperseg=2048)[1][:, :N]


def roll_off(x):
    return signal.sosfilt(signal.butter(12, 16880, fs=SR, output="sos"), x)


def record(dry):
    x = signal.sosfilt(signal.butter(3, 52, "highpass", fs=SR, output="sos"), dry)
    x = signal.sosfilt(signal.ellip(10, 0.3, 70, 15750, fs=SR, output="sos"), x)
    mix = masked(x)
    return roll_off(mix)


dry = scene()
out = record(dry)
unload_audio(out)
```